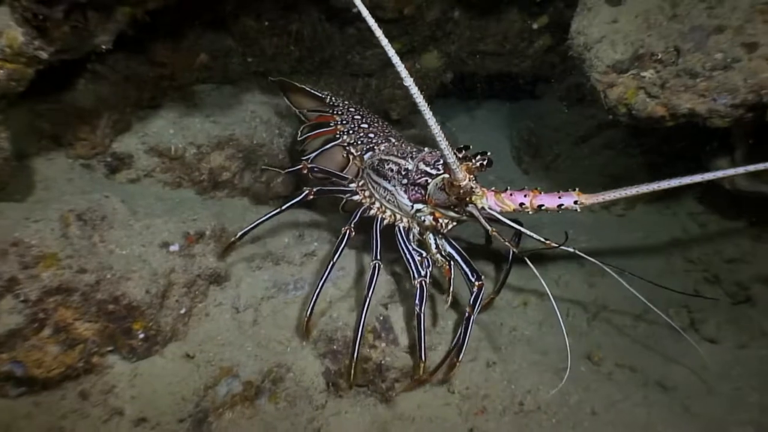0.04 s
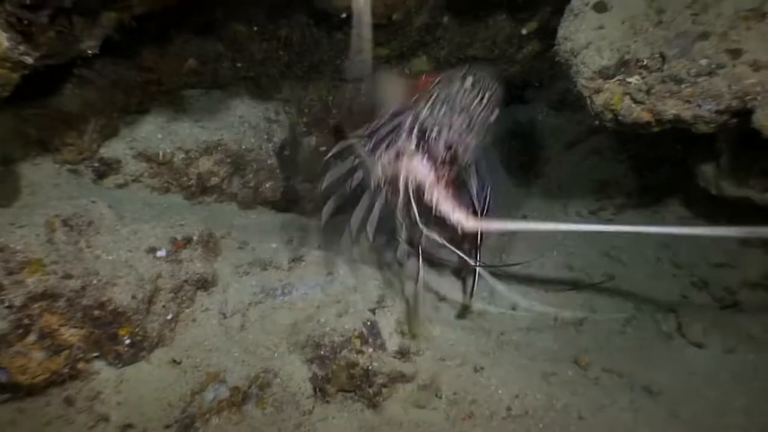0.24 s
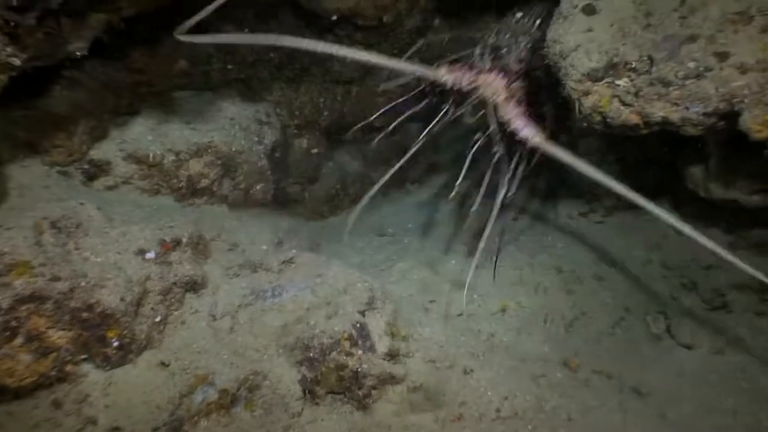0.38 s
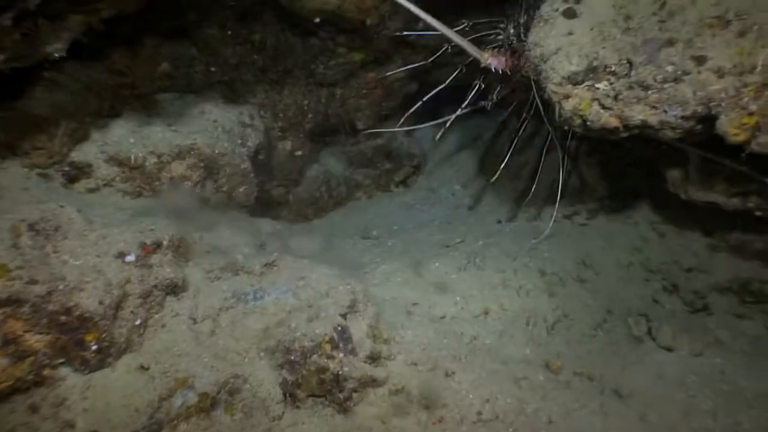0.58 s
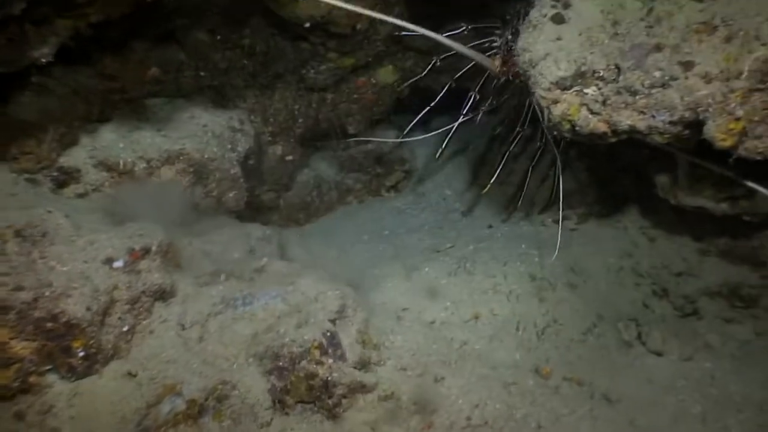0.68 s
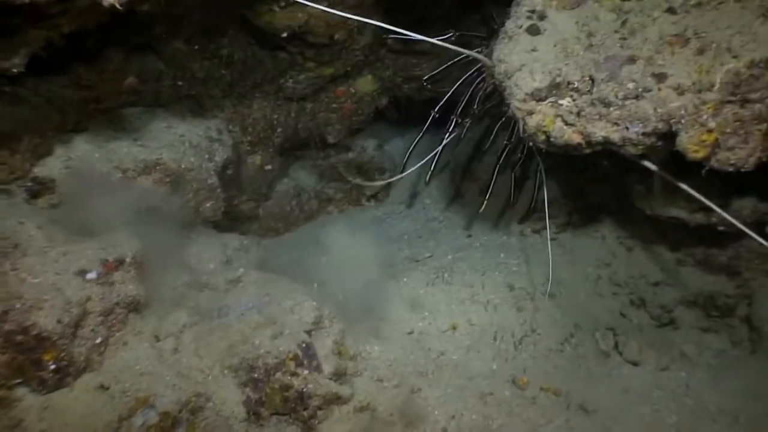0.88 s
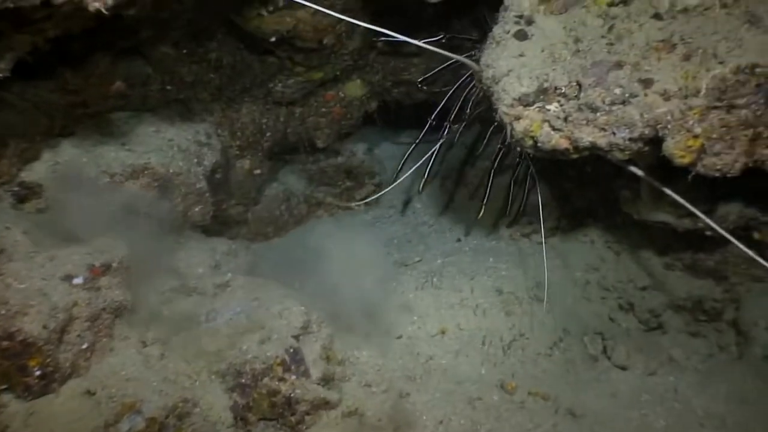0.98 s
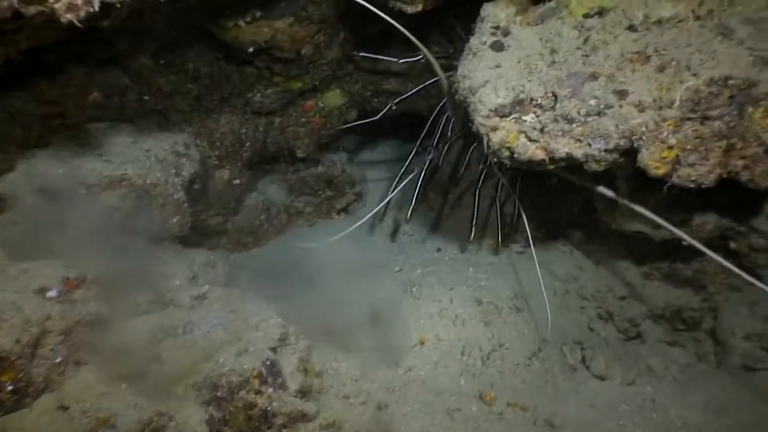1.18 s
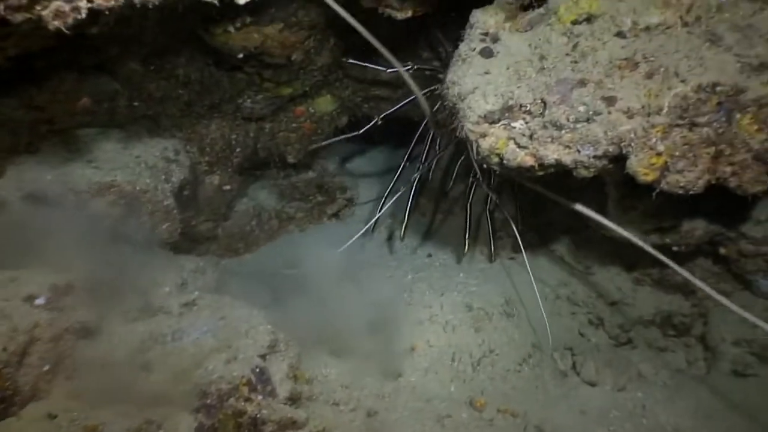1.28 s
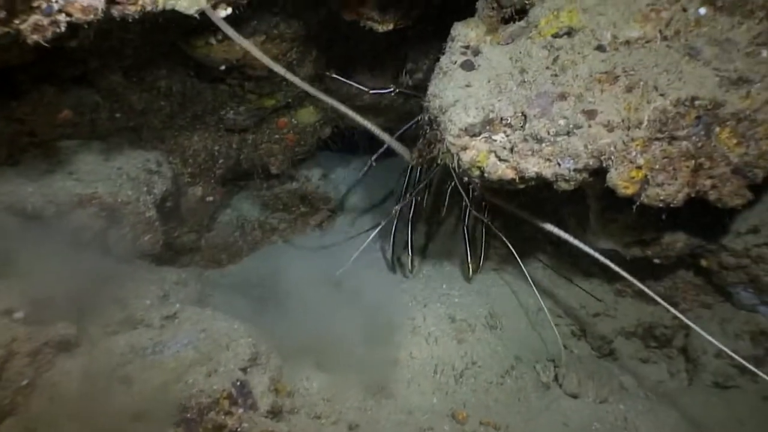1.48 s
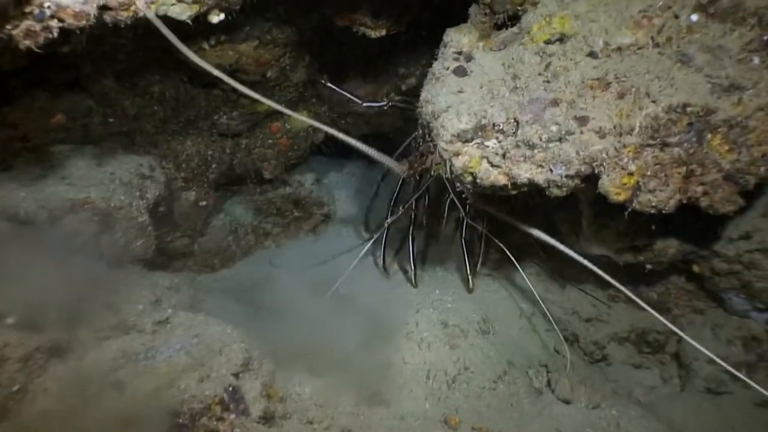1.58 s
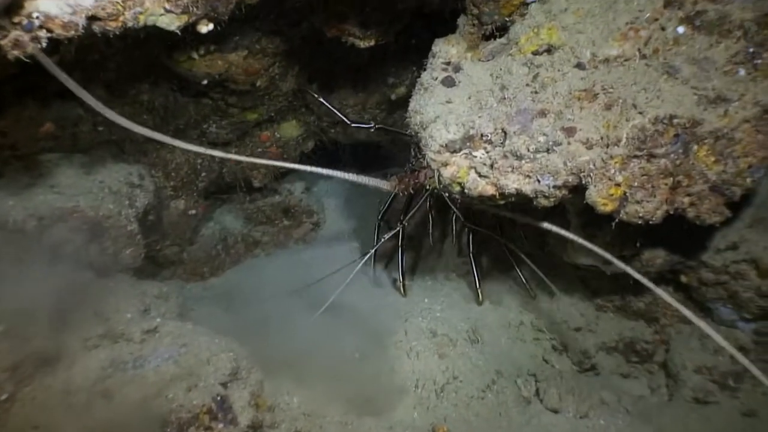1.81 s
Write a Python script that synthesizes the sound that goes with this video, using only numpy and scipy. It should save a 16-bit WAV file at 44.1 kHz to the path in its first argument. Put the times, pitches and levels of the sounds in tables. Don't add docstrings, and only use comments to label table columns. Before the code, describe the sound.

Brief creaky lobster rasp underwater, followed by leg ticks and scrapes, shrimp snaps and camera whine

```python
import sys
import numpy as np
from scipy import signal
from scipy.fft import rfft, irfft, next_fast_len
from scipy.io import wavfile
from scipy.ndimage import map_coordinates

SR = 44100
rng = np.random.default_rng(int(sys.argv[2]) if len(sys.argv) > 2 else 0)


def ratio_of_db(decibels):
    return 10 ** (np.asarray(decibels, float) / 20)


def master(y):
    cut = np.clip(np.atleast_2d(y).T, -1, 1)
    pcm = np.round(cut * 32767)
    wavfile.write(sys.argv[1], SR, pcm.astype(np.int16))


N = 81585

# pitch_hz, level_db [dB per Hz]
HISS_COLOUR = [(12, -0.5), (60, -9), (760, -6.5), (880, -15), (2600, -9.5), (4600, -19.5), (5400, -22.5),
               (10000, -31.5), (16000, -21.5)]
# pitch_hz, level_db
HISS_SIDE_COLOUR = [(20, -4), (300, -5), (1000, -14.5), (8000, -26), (10500, -13), (14000, -20)]
# pitch_hz, level_db
FAINT_WHINES = [(11380, -73.5), (11670, -74), (5636, -68.5), (3940, -65.5)]
PHASE_SLIP_AT = (.264, .755)
PHASE_SLIP_RAD = (.62, -2.2)
# pitch_hz, level_db
CHATTER_COLOUR = [(150, -41), (600, -7), (1500, -8.5), (3000, -6), (5000, -7.5), (8000, -12),
                  (11600, -19.5), (16000, -15.5)]
# start_s, peak_db, pitch_hz, decay_s [to -60 dB]
NEAR_CLICKS = [(0.0184, -35, 2400, 0.013), (0.0368, -29.5, 4540, 0.0089), (0.078, -37, 2550, 0.011),
               (0.0906, -34, 3060, 0.012), (0.1802, -29, 4600, 0.0079), (0.2189, -25.5, 2900, 0.0071),
               (0.5202, -31, 2900, 0.0085), (.5285, -34, 2900, .008), (.536, -35, 2600, .008),
               (0.5536, -18, 2900, 0.0083), (.5562, -25.5, 2900, 0.008), (.581, -35, 2900, 0.007),
               (0.6063, -29.5, 4600, 0.0091), (.648, -32.5, 2380, 0.016), (0.6531, -22, 2900, 0.0064),
               (.667, -39, 2380, 0.018), (0.712, -33.5, 2630, 0.012), (0.7861, -33.5, 2620, 0.012),
               (0.8103, -27.5, 2750, 0.007), (0.833, -29, 2000, 0.012), (0.8625, -29, 3740, 0.0079),
               (0.8643, -25.5, 2450, 0.0085), (0.9408, -35, 4500, 0.012), (.992, -42, 3990, .008),
               (1.0015, -37.5, 2800, .009), (1.0265, -42, 2900, .01), (1.029, -43, 4440, .009),
               (1.035, -39, 4900, .009), (1.04, -36, 2430, 0.012), (1.049, -38.5, 4400, 0.013),
               (1.057, -44, 4870, .008), (1.074, -45, 4900, 0.0073), (1.1652, -38.5, 4370, 0.013),
               (1.1992, -23, 2523, 0.013), (1.202, -38.5, 2060, 0.012), (1.2046, -32.5, 2740, 0.0099),
               (1.23, -41, 2720, 0.011), (1.275, -35, 4800, 0.0094), (1.3298, -31, 5400, 0.0097),
               (1.4758, -31, 4650, 0.01), (1.5928, -36.5, 3160, 0.012), (1.7127, -34.5, 4200, 0.012),
               (1.76, -37.5, 2250, 0.011), (1.77, -37, 2950, 0.012), (1.782, -36, 2830, 0.011)]
# start_s, wait_s [until the next slip]
RIGHT_PULL_WAITS = [
    (.2346, .0081),
    (.2427, .0025),
    (.2526, .0023),
    (.2548, .0061),
    (.2672, .0062),
    (.2733, .0074),
    (.2807, .006),
    (.2867, .0098),
    (.297, .01),
]
LEFT_PULL_WAITS = [
    (.2586, .0063),
    (.2712, .0064),
    (.2776, .00525),
    (.2883, .0053),
    (.2991, .0062),
    (.3053, .0078),
    (.314, .008),
]
RETURN_WAITS = [
    (.3247, .0062),
    (.3309, .0051),
    (.3415, .00585),
    (.3532, .006),
    (.3657, .0068),
    (.3725, .0077),
    (.381, .008),
]
# start_s, level_db
RIGHT_PULL_EFFORT = [
    (.2346, -20),
    (.2427, -21),
    (.2455, -14),
    (.2527, -14),
    (.2548, -10),
    (.2733, -13),
    (.2807, -6),
    (.2867, -24),
    (.2965, -14),
]
LEFT_PULL_EFFORT = [
    (.2586, -5.5),
    (.277, -3),
    (.288, -.5),
    (.299, -3.5),
    (.306, -8),
    (.313, -20),
]
RETURN_STROKE_EFFORT = [
    (.3247, -10),
    (.331, -4.5),
    (.3415, -1.5),
    (.3535, -4),
    (.366, -8),
    (.3803, -16),
]
# pitch_hz, decay_s [to -60 dB], then level_db on the right pull, left pull and return
SHELL_MODES = [(2600, 0.0097, -6, -10, -4.5), (2873, 0.0049, 3, 1, -0.5), (3560, 0.003, -6, -12, -5),
               (4500, 0.0028, -14, -10.5, -12), (5400, 0.0033, -11, -18, -23),
               (6060, 0.0047, -30, -19.5, -15.5), (7200, 0.0039, -14, -17, -14.5),
               (8860, 0.0024, -22, -19, -12.5), (10500, 0.0026, -23, -10, -16.5),
               (11300, 0.0027, -14, -32, -20.5), (12800, 0.0014, -22, -28, -16),
               (14800, .0025, -25, -21, -32)]
# start_s, pitch_ratio
SHELL_FLEX = [
    (.24, 1.08),
    (.3, 1.12),
    (.325, 1.073),
    (.38, 1.05),
]
# start_s, peak_db, pitch_hz, decay_s [to -60 dB]
WATER_BUMPS = [(.262, -43.5, 557, 0.064), (.278, -42, 398, 0.07), (.285, -42, 716, 0.055),
               (.345, -42, 665, 0.099), (0.515, -37.5, 231, 0.083), (.553, -31.5, 626, 0.027),
               (0.553, -28, 1320, 0.022), (0.639, -42, 251, 0.079), (1.04, -42.5, 598, 0.056),
               (1.065, -48, 735, .05), (1.205, -43.5, 237, 0.076), (1.208, -42.5, 430, 0.065),
               (1.319, -40.5, 290, 0.037), (1.79, -42, 643, 0.026)]
# start_s, level_db, brightness_db
LEG_SCRAPE = [(.5, -64, -12), (0.521, -51.5, -6), (.548, -48.5, 5), (.555, -44, 5.5), (.6, -46, 2.5),
              (.63, -57, -3), (.655, -43, -22), (.68, -53, -11), (.75, -64.5, -12), (.85, -58, -18),
              (.875, -51, -21), (.92, -59, -18), (1, -63.5, -16), (1.04, -53.5, -15), (1.09, -74, -16),
              (1.2, -82, -14)]
# pitch_hz, width_hz, level_db; the last two follow brightness
ROCK_BANDS = [
    (2750, 1400, 4.5),
    (4600, 4000, -5.5),
    (7330, 1000, 2.5),
    (11100, 5000, -18),
]
# start_s, peak_db, pitch_hz, decay_s [to -60 dB]
CLAW_TICKS = [(.5205, -29, 6500, .005), (.521, -40, 11400, .006), (.528, -35, 6000, .006),
              (.536, -37, 5500, .005), (.5425, -31, 6000, .005), (.543, -38, 10500, .005),
              (0.553, -21, 5700, 0.0052), (0.5537, -29, 7530, 0.012), (.599, -29, 7200, .007),
              (.627, -33, 6100, .006), (0.6522, -30, 5660, 0.0066), (.665, -40, 12000, .009),
              (.7865, -30, 5840, 0.0055), (.811, -29, 6300, .006), (0.8623, -31, 4800, .005),
              (1.1995, -44, 5000, 0.0037), (1.33, -40, 7000, .005)]


def unit(x):
    return x / np.sqrt(np.mean(x ** 2) + 1e-20)


def curve(rows):
    return np.interp(np.arange(N) / SR, *np.transpose(rows))


def wobble(rate):
    points = rng.standard_normal(int(N * rate / SR) + 4)
    return map_coordinates(points, [np.arange(N) * rate / SR])


def filtered(x, response):
    m = next_fast_len(N + 8192)
    return irfft(rfft(x, m) * response(np.fft.rfftfreq(m, 1 / SR)), m)[..., :N]


def coloured(x, points):
    f, db = np.transpose(points)
    return filtered(x, lambda hz: ratio_of_db(np.interp(np.log(hz + 1), np.log(f + 1), db)))


def butter(x, hz, kind, order):
    return signal.sosfilt(signal.butter(order, hz, kind, fs=SR, output="sos"), x)


def add(track, s, sound):
    part = track[..., round(s * SR):][..., :sound.shape[-1]]
    part += sound[..., :part.shape[-1]]


def sine(db, phase):
    return ratio_of_db(db) * np.sqrt(2) * np.sin(phase)


def ping(hz, t60, rise, smear, crack):
    t = np.arange(SR // 12) / SR
    noise = rng.standard_normal((2, len(t)))
    phase = 2 * np.pi * hz * t + smear * np.cumsum(noise[0]) * np.sqrt(hz / SR)
    tone = np.sin(phase) * ratio_of_db(-60 * t / t60) * (1 - np.exp(-t / rise))
    return tone + crack * noise[1] * ratio_of_db(-60 * t / 0.0029)


def pings(events, gain_db, rise, smear, crack):
    out = np.zeros(N)
    for s, db, hz, t60 in events:
        add(out, s, ratio_of_db(db + gain_db) * ping(hz, t60, rise, smear, crack))
    return out


def hiss():
    level_db, side_db, swell_db = -51.5, -23.5, -0.75
    mid, side = rng.standard_normal((2, N))
    mid = unit(coloured(mid, HISS_COLOUR)) * ratio_of_db(swell_db * wobble(4.9))
    side = ratio_of_db(side_db) * unit(coloured(side, HISS_SIDE_COLOUR))
    return ratio_of_db(level_db) * np.array([mid, side])


def whines():
    whine_hz, beat_hz, beat_null_s = 7752.1, 17.45, 1.73
    t = np.arange(N) / SR
    out = sine(-43.5 + 1.25 * wobble(25.12), 2 * np.pi * whine_hz * t)
    overtone = 4 * np.pi * whine_hz * t
    out += sine(-65.5, overtone)
    out -= sine(-62.5, overtone - 2 * np.pi * beat_hz * (t - beat_null_s))
    for hz, db in FAINT_WHINES:
        out += sine(db + 3 * wobble(39.7), 2 * np.pi * hz * t)
    return out


def scan_tone(frame_hz):
    slip_span = 0.014
    t = np.arange(N) / SR
    place = t * frame_hz % 1
    slip = 0
    for at, rad in zip(PHASE_SLIP_AT, PHASE_SLIP_RAD):
        slip = slip + rad * (np.clip((place - at) / slip_span, 0, 1) - place)
    return sine(-51.5, 2 * np.pi * 286 * frame_hz * t + slip)


def field_spikes(frame_hz):
    gap_s, start_s, spike_s, tick_s = .001245, .0045, .00006, .0001
    spike_db, tick_db, chatter_db, gated_db = -41.5, -53, -54, -61.5
    t = np.arange(N) / SR
    step = ((t - start_s + gap_s / 2) % (.5 / frame_hz)) / gap_s
    busy = step < 8
    from_spike = (step % 1 - .5) * gap_s
    x = from_spike / spike_s
    spike = np.exp(-x ** 2) - .5 * np.exp(-((x - 2.5) / 1.8) ** 2)
    spikes = -ratio_of_db(spike_db) * busy * spike
    tick = np.exp(-(from_spike / tick_s) ** 2) * np.sin(2 * np.pi * 13000 * from_spike)
    spikes += ratio_of_db(tick_db) * busy * tick
    frame_sample = t * frame_hz % 1 * SR / frame_hz
    pattern = np.interp(frame_sample, np.arange(1500), rng.standard_normal(1500)) * busy * (step > 2.2)
    gated = rng.standard_normal(N) * busy
    chatter = ratio_of_db(chatter_db) * unit(coloured(pattern, CHATTER_COLOUR))
    chatter += ratio_of_db(gated_db) * unit(coloured(gated, CHATTER_COLOUR))
    return butter(spikes, 770, "high", order=2) + chatter


def camera():
    frame_hz = 29.97
    return whines() + scan_tone(frame_hz) + field_spikes(frame_hz)


def far_reef():
    per_s, level_db, size_db = 190, -52, 3
    middle_hz, spread, cycles = 2900, 0.225, 7.8
    out, t = np.zeros(N), np.arange(400) / SR
    for when, pitch, size in rng.random((int(per_s * N / SR), 3)):
        hz = middle_hz * np.exp(spread * (4 * pitch - 2))
        snap = np.sin(2 * np.pi * hz * t) * np.exp(-t * hz / cycles) * (1 - np.exp(-t * hz))
        add(out, when * N / SR, ratio_of_db(level_db - size_db * np.log(size)) * snap)
    return out


def near_shrimp():
    snaps = pings(NEAR_CLICKS, 6, rise=0.00073, smear=0.57, crack=0.12)
    return butter(snaps, [1620, 6500], "band", order=3)


def slips(waits, effort):
    s, out = waits[0][0], []
    while s < waits[-1][0]:
        out.append((s, np.interp(s, *np.transpose(effort))))
        s += np.interp(s, *np.transpose(waits))
    return out


def shell_ring(s, db, level, hz, t60):
    weak_dulls, scatter_db, detune, body_rise_s = 0.12, 0.7, .008, .00006
    t = np.arange(1024) / SR
    a, b = rng.standard_normal((2, len(hz), 1))
    upper = np.arange(len(hz))[:, None] > 2
    tuning = np.where(upper, 1, np.interp(s, *np.transpose(SHELL_FLEX)))
    mode_db = level + weak_dulls * db * np.log(hz / hz[0]) + scatter_db * a
    modes = ratio_of_db(mode_db - 60 * t / t60) * np.cos(2 * np.pi * hz * (tuning + detune * b) * t)
    return modes * np.where(upper, 1, 1 - np.exp(-t / body_rise_s))


def slip_sound(modes):
    ledge_db, ledge_t60, ledge_delay_s = -17, 0.0067, 0.0017
    side_db, grit_db, grit_t60 = -28, -21, 0.0096
    t = np.arange(1024) / SR
    noise = rng.standard_normal((3, len(t)))
    echo = ratio_of_db(ledge_db - 60 * t / ledge_t60) * noise[:2] * np.clip(t / ledge_delay_s, 0, 1) ** 2
    echo[0, 0] = 1
    echo[1] = ratio_of_db(side_db) * np.diff(noise[1], prepend=0) * ratio_of_db(-60 * t / ledge_t60)
    sound = signal.fftconvolve(modes.sum(axis=0)[None], echo, axes=1)
    grit = ratio_of_db(grit_db - 60 * t / grit_t60) * noise[2]
    sound[0] += signal.fftconvolve(modes[3:].sum(axis=0), grit)
    return sound


def rasp():
    slip_db, arrival_s, tremble_db, tremble_s, boom_db = -2, .00013, -35, .001, -19.5
    out = np.zeros((2, N))
    hz, t60, *colours = np.transpose(SHELL_MODES)[..., None]
    lead = np.arange(-128, 0) / SR
    strokes = [(RIGHT_PULL_WAITS, RIGHT_PULL_EFFORT), (LEFT_PULL_WAITS, LEFT_PULL_EFFORT),
               (RETURN_WAITS, RETURN_STROKE_EFFORT)]
    for (waits, effort), level in zip(strokes, colours):
        for s, db in slips(waits, effort):
            gain = ratio_of_db(db + slip_db)
            modes = shell_ring(s, db, level, hz, t60)
            add(out, s + arrival_s, gain * slip_sound(modes))
            tremble = ratio_of_db(tremble_db) * rng.standard_normal(len(lead)) * np.exp(lead / tremble_s)
            add(out[0], s + lead[0], gain * signal.fftconvolve(modes.sum(axis=0), tremble))
    out[1] = butter(out[1], 8000, "low", order=2)
    boom = ratio_of_db(boom_db) * butter(out, 750, "low", order=2)
    return butter(butter(out, 1724, "high", order=3) + boom, 14100, "low", order=2)


def water_bumps():
    bumps = pings(WATER_BUMPS, 6.5, rise=0.007, smear=1.0, crack=0)
    return butter(bumps, 180, "high", order=2)


def scrape():
    s, level_db, bright_db = np.transpose(LEG_SCRAPE)
    out = np.zeros(N)
    for k, (c, w, db) in enumerate(ROCK_BANDS):
        grit = rng.standard_normal(N) * ratio_of_db(3.7 * wobble(300))
        band = unit(filtered(grit, lambda f: (1j * f * w / (c * c - f * f + 1j * f * w)) ** 2))
        loudness = curve(np.c_[s, level_db + bright_db * (k > 1)])
        out += ratio_of_db(db + loudness) * band
    return out


def claw_ticks():
    ticks = pings(CLAW_TICKS, -1.5, rise=0.00022, smear=0.58, crack=.12)
    return butter(ticks, 1900, "high", order=2)


def scene():
    mid, side = hiss() + rasp()
    mid = mid + camera() + far_reef() + near_shrimp()
    mid = mid + water_bumps() + scrape() + claw_ticks()
    return np.array([mid + side, mid - side])


def band_limit(x):
    return signal.sosfilt(signal.butter(12, 16960, fs=SR, output="sos"), x)


def record(dry):
    mix = filtered(dry, lambda hz: hz < 15800)
    return band_limit(mix)


dry = scene()
out = record(dry)
master(out)
```